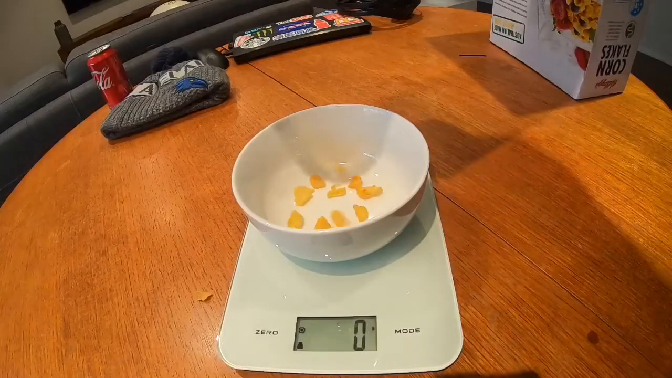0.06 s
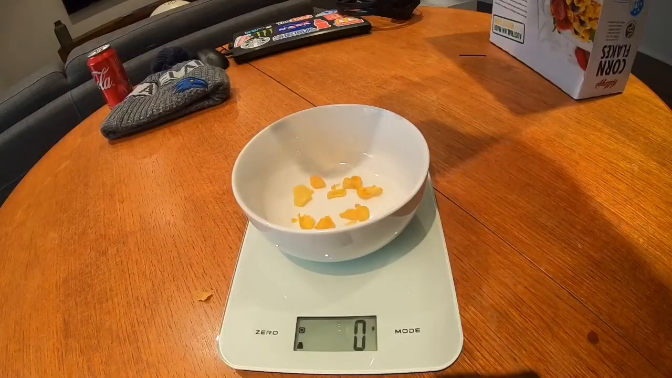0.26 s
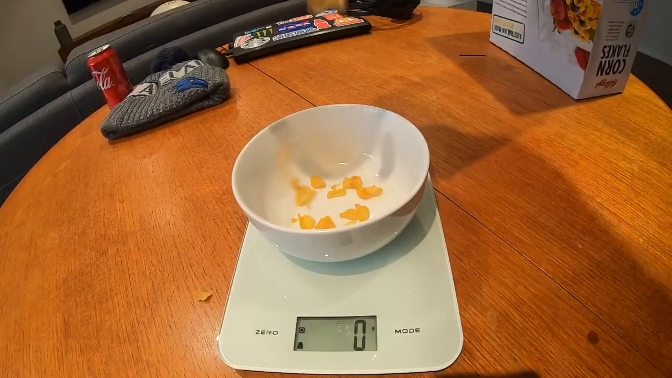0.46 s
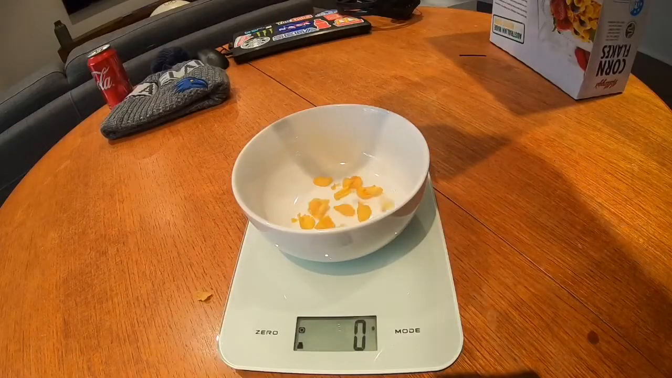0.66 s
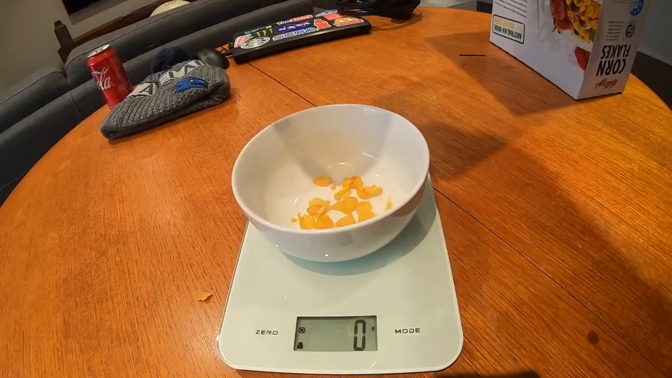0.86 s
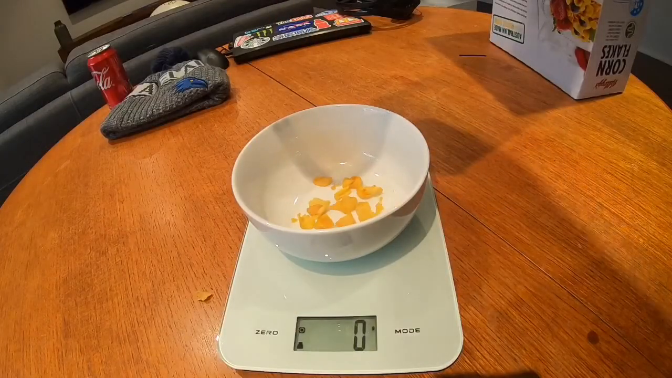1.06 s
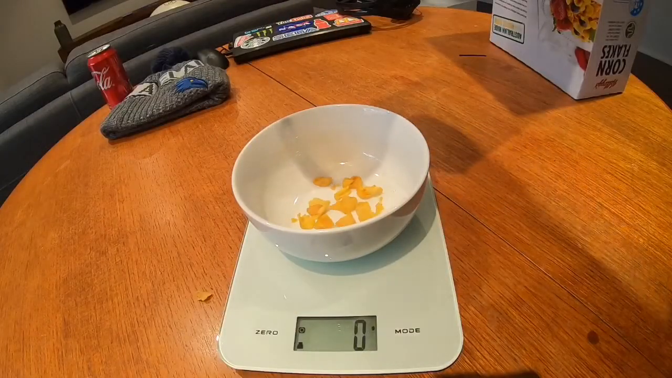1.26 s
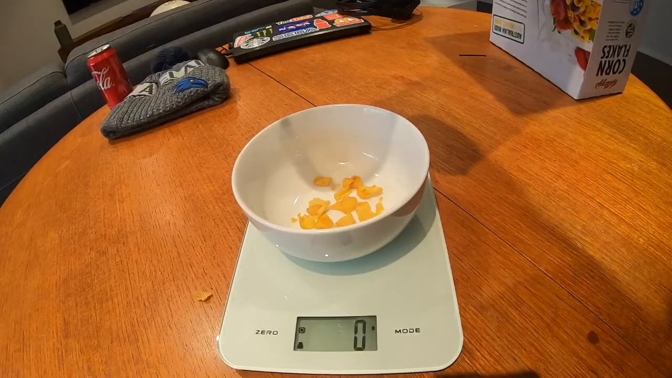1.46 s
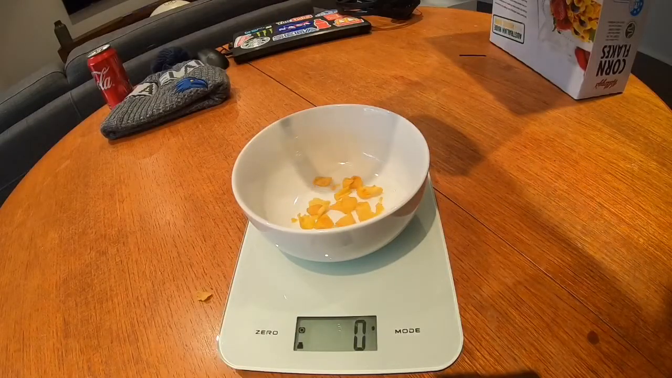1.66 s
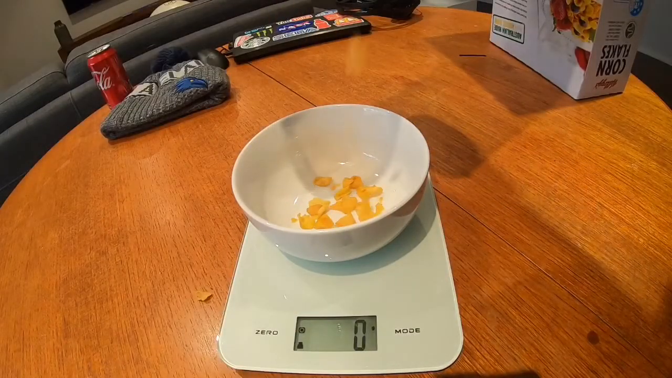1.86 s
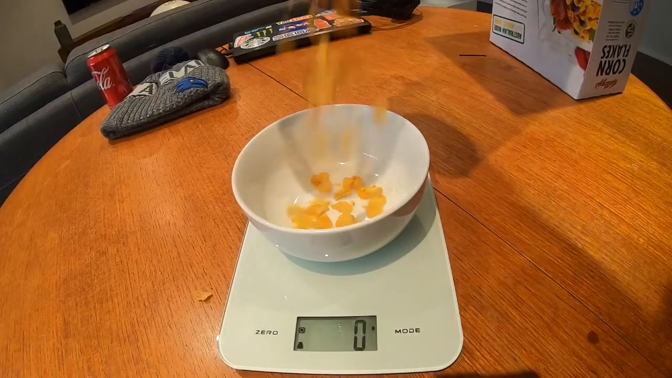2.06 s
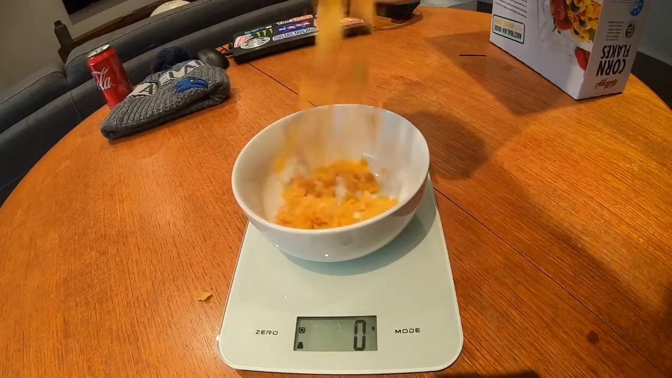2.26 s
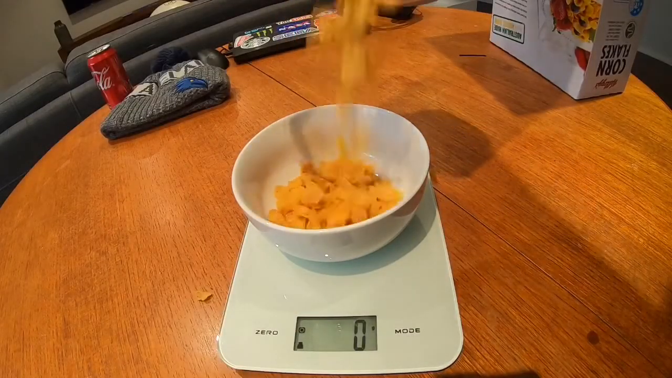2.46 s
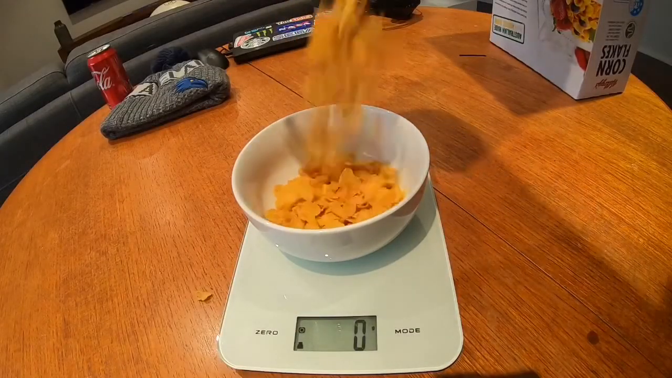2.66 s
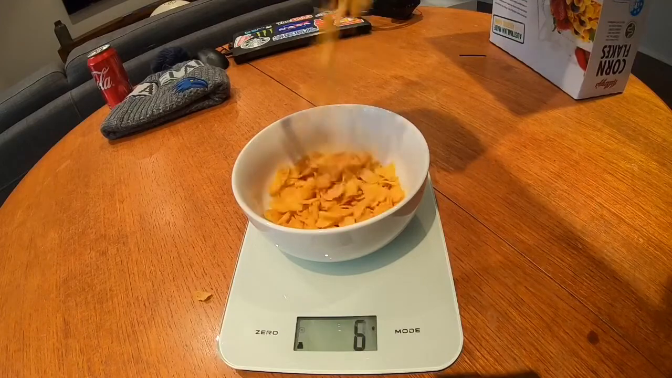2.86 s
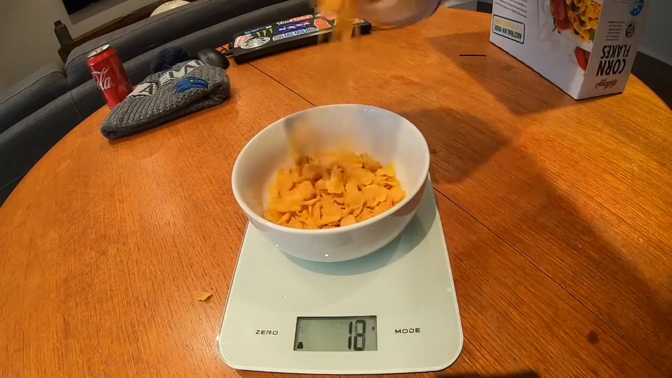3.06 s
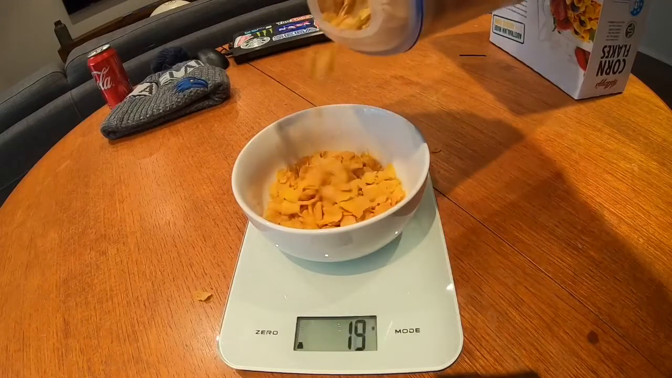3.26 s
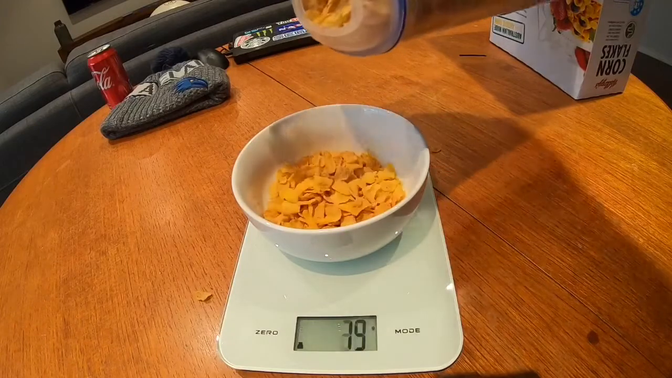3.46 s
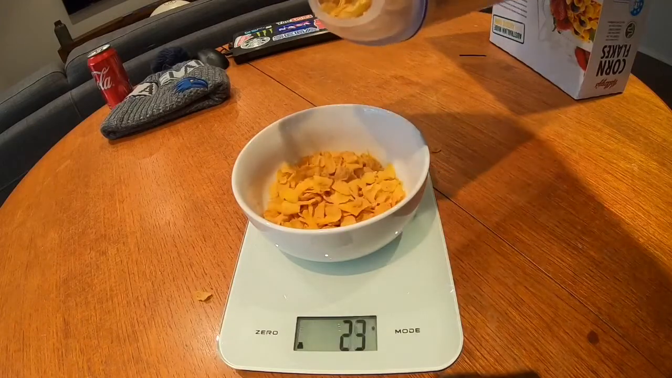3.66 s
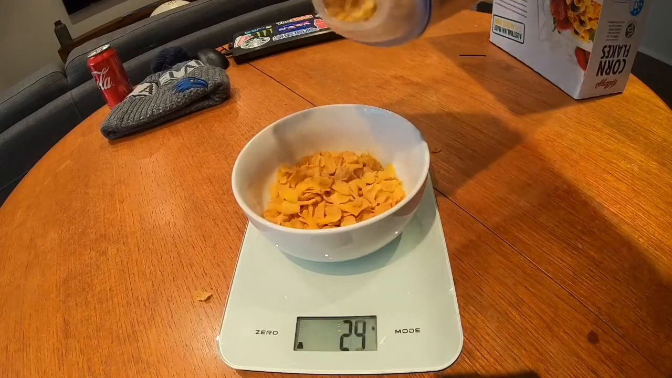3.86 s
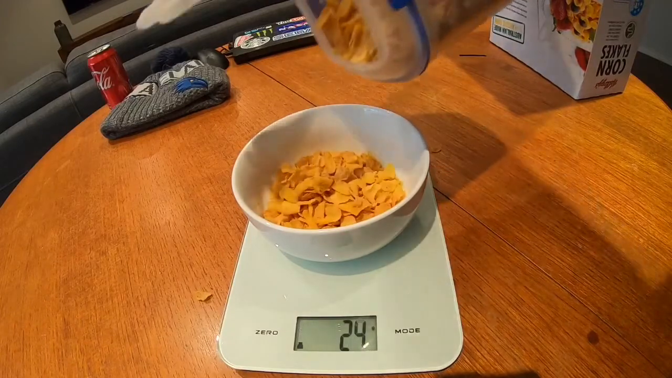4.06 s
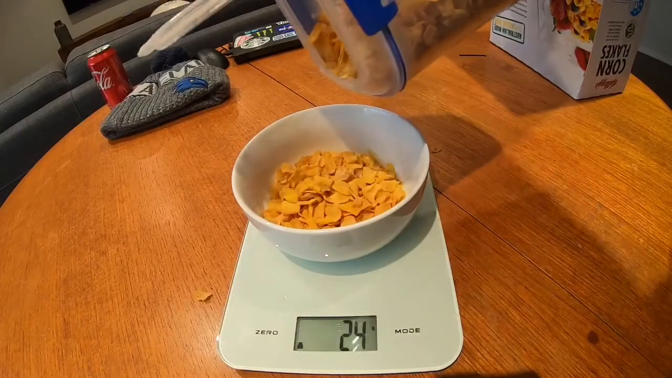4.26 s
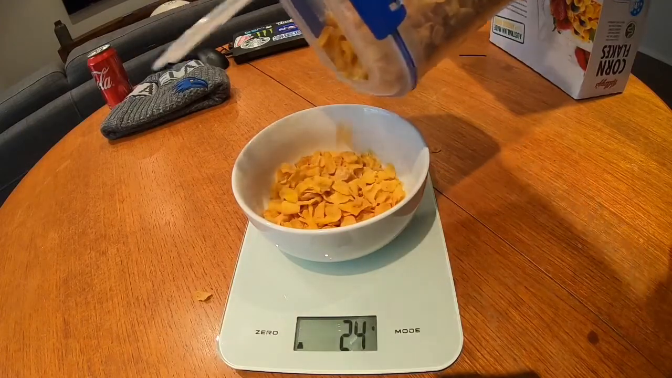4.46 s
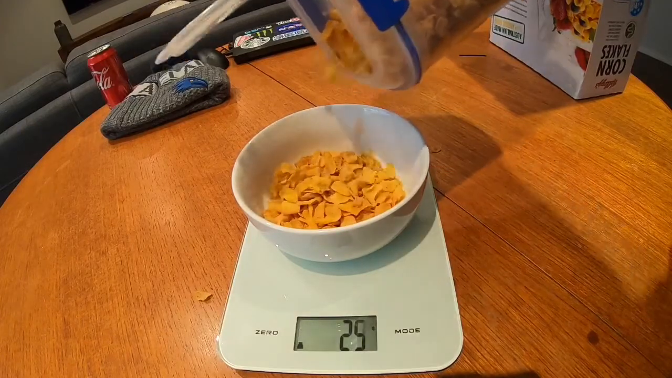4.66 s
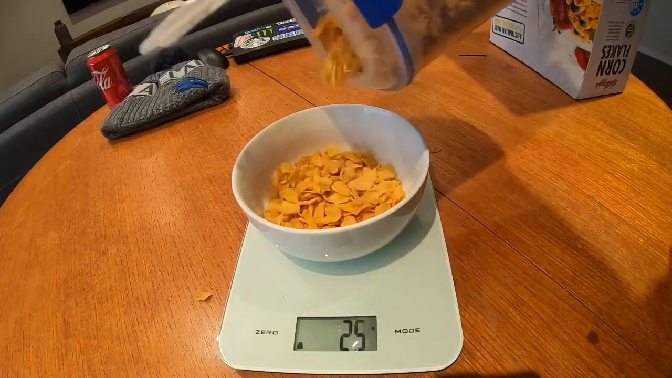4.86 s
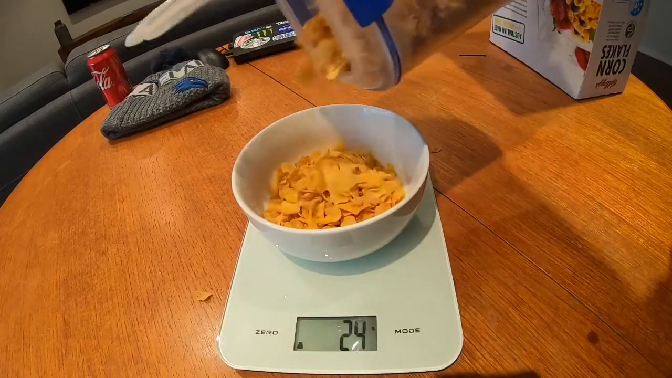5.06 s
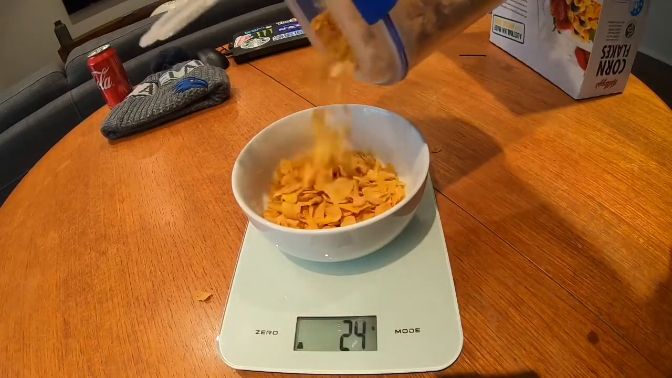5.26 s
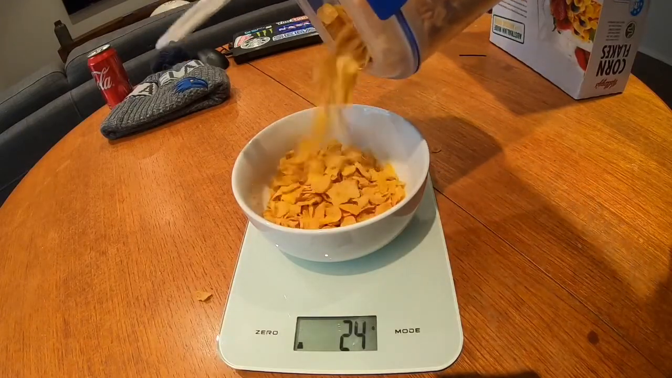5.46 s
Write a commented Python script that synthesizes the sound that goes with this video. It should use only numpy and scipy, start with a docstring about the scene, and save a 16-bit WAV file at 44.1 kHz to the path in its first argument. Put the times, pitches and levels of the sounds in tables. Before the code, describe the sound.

Close stereo capture in a small quiet kitchen. Isolated cereal flakes tick against a nearly empty ceramic bowl, then a near-silent gap. A dense, brittle pour rushes in with crunching clumps and faint bowl pings, thinning to stray ticks. The plastic tub knocks softly, then a lighter, jerky pour lands on the heap.

```python
"""Corn flakes pour from a plastic tub into a ceramic bowl on a kitchen table, close to a two-port microphone.
Each flake is a noise snap with a brief ring; in numbers they make a patter, in runs a crunch.
A few flakes tick and ping the nearly empty bowl, then the load slides down the tub and pours in clumps.
The tub, a noise rustle with a boom, knocks in the hand; a second, shaken pour lands on the heap.
The bowl rings as decaying sines, a small room answers, and a faint room tone and deep rumble lie behind."""
import sys
import numpy as np
from scipy import signal
from scipy.fft import rfft, irfft, next_fast_len
from scipy.io import wavfile
from scipy.ndimage import uniform_filter1d, map_coordinates

SR = 44100
rng = np.random.default_rng(int(sys.argv[2]) if len(sys.argv) > 2 else 0)


def inscribe(sig):
    """Save sig as 16-bit PCM at rate SR to the path in sys.argv[1].

    A 1-D sig is mono; a 2-D sig holds one channel per row.
    Samples are clipped to [-1, 1] before scaling.
    """
    pcm = np.round(np.clip(np.atleast_2d(sig).T, -1, 1) * 32767)
    wavfile.write(sys.argv[1], SR, pcm.astype(np.int16))


N = 243431

# Levels are relative, ahead of room and microphone; spectra give shape only.
# Stream of flakes landing in the bowl, one curve a pour: [t/s, level/dB]
POUR_CURVES = [
    [(0.0, -45.5), (0.252, -47.5), (0.31, -49.5)],
    [(0.55, -73.5), (0.712, -48.5), (0.788, -44), (0.944, -52.5), (1.008, -77.5), (1.08, -68)],
    [(1.95, -43), (2.0, -35), (2.114, -35.5), (2.202, -26.5), (2.326, -26.5), (2.618, -26), (3.114, -33),
     (3.314, -37.5), (3.506, -46), (3.644, -54), (3.8, -90.5)],
    [(4.26, -82), (4.378, -66), (4.74, -44), (4.9, -43), (5.054, -38.5), (5.258, -37), (5.384, -31),
     (5.52, -38)],
]
# Single flakes hitting: [t/s, level/dB, flake's own pitch f/Hz]
SINGLE_FLAKES = [(0.0107, -22.5, 8800), (0.0199, -21.5, 4970), (0.099, -27.5, 3660), (0.1106, -24.5, 5100),
                 (0.271, -36, 9600), (0.5273, -20, 7000), (0.5331, -17.5, 5800), (0.5609, -11.5, 6920),
                 (0.6484, -20.5, 6970), (0.6817, -26, 5170), (0.7076, -23.5, 5230), (0.7434, -16.5, 6230),
                 (0.7665, -28, 5660), (0.7782, -25, 7180), (0.8318, -24.5, 7030), (0.8348, -26, 6880),
                 (1.943, -12.5, 6500), (1.9656, -21, 2730), (1.9925, -20.5, 5460), (2.1899, -8, 4120),
                 (2.2785, -14.5, 7800), (2.353, -9, 5100), (2.7535, -13, 6000), (2.95, -13, 2970),
                 (2.9722, -13, 3480), (3.1, -19, 5860), (3.162, -18, 5660), (3.3471, -25.5, 5760),
                 (3.383, -28.5, 9450), (3.4428, -24, 7000), (3.562, -35, 3360), (3.6206, -34, 3420),
                 (3.657, -38, 6500), (4.4476, -36.5, 6340), (4.4825, -30.5, 8050), (4.492, -36.5, 4630),
                 (4.569, -24, 5630), (4.586, -31, 6300), (4.6891, -25, 5990), (4.788, -23, 5800),
                 (5.0197, -18, 7740), (5.1223, -19, 6990), (5.3634, -14.5, 8210), (5.389, -19, 6940)]
# Clumps of flakes crunching on the heap: [t/s, level/dB, length/s, pitch f/Hz]
CRUNCHING_CLUMPS = [(2.134, -15.5, .04, 7700), (2.2267, -12, 0.029, 8000), (2.256, -12, .035, 5120),
                    (2.371, -12, .04, 4950), (2.4393, -11, 0.035, 8600), (2.624, -12.5, .03, 5160),
                    (2.673, -12.5, .03, 5930), (2.711, -12.5, .05, 6990), (2.772, -12.5, .04, 6130),
                    (2.805, -12, .075, 6040), (3.007, -15, .04, 6720), (3.113, -15, .023, 5560),
                    (3.21, -22, .016, 8490), (3.2313, -14.5, .015, 6230), (3.2495, -15.5, 0.019, 6260),
                    (3.2657, -13.5, .018, 6720), (3.3345, -14.5, .012, 5530), (3.412, -16.5, .014, 7830),
                    (3.4247, -17.5, .014, 7160), (3.9, -52, 0.053, 6000), (4.8237, -19.5, .017, 7300),
                    (5.03, -12, .013, 8200), (5.069, -21, .018, 8300), (5.125, -20, .04, 6600),
                    (5.213, -14.5, .014, 6100), (5.2604, -17.5, .017, 7400), (5.304, -15, .017, 7050),
                    (5.3227, -15, .025, 6800)]
# Colour of flakes landing in stream and clumps: [f/Hz, level/dB]
LANDING_SPECTRUM = [(180, -29), (300, -32), (614, -32.5), (1230, -16.5), (1300, -15), (1610, -12),
                    (1930, -7), (2210, -8.5), (2880, -2.5), (4370, -3.5), (6520, 0.5), (9550, -1.5),
                    (11100, -13), (14000, -15.5), (16000, -26.5)]
# Air resonances in the bowl: [f/Hz, width/Hz, level/dB]
BOWL_AIR = [(1913, 210, 5.5), (2800, 100, 1.5), (790, 200, 9)]
# Colour of a lone flake's tick: [f/Hz, level/dB]
LONE_TICK_SPECTRUM = [(180, -46.5), (300, -41), (1560, -12.5), (2000, -9), (2480, -12.5), (3030, -5.5),
                      (4230, -5.5), (6620, -3), (7820, -4.5), (9390, -6.5), (11100, -17.5), (12100, -14.5),
                      (16000, -35.5)]
# Ringing modes of the ceramic bowl: [f/Hz, t60/s, how easily a flake stirs it level/dB]
BOWL_MODES = [(1330, 1.16, -61.5), (3320, 0.53, -60.5), (5129, 0.34, -45), (5770, .26, -67),
              (6800, 0.16, -68.5), (7340, .2, -66.5)]
# Flakes pinging the bowl, damped once the heap has grown; the spot decides which modes ring:
# [t/s, first mode level/dB, second mode level/dB, third mode level/dB, upper modes level/dB]
BOWL_PINGS = [(.012, -68, -66, -42.5, -66), (.112, -68, -72, -49.5, -68), (.562, -56, -53, -54.5, -61),
              (0.709, -71, -59, -41.5, -67), (.744, -50.5, -42.5, -44.5, -41),
              (2.192, -47, -48, -37.5, -54), (2.259, -57.5, -46, -27, -50), (2.343, -61, -47, -29, -48),
              (2.688, -43.5, -33, -41.5, -56.5), (2.799, -48, -38, -49, -54), (3.617, -76, -60, -68, -61),
              (5.421, -56, -32, -65, -65)]
# The load sliding along the tub, one curve for each slow tilt: [t/s, level/dB]
SLIDE_CURVES = [
    [(1.1, -93), (1.3, -70.5), (1.62, -54), (1.95, -49), (2.45, -52), (3.1, -59.5), (3.45, -74),
     (3.78, -80.5)],
    [(3.8, -77), (4.12, -78.5), (4.27, -70.5), (4.4, -64), (4.53, -78), (4.72, -65.5), (4.88, -66)],
]
# The tub's wall booms less as the load leaves it, more when tipped back: [t/s, boom over rustle level/dB]
LOAD_BOOM = [(1.3, 5), (2.2, 2.5), (2.8, -4.5), (3.7, 8), (4.7, 1.5)]
# Jerks of the hand that shift the flakes in the tub: [t/s, level/dB, hold/s, boom over rustle level/dB]
HAND_SHAKES = [(0.063, -63.5, .02, 8), (0.307, -52, 0.047, 3.5), (0.504, -65, 0.12, 6),
               (0.859, -69.5, 0.022, 10.5), (4.609, -55, 0.045, 1.5), (4.871, -54, 0.038, 4),
               (4.979, -56.5, 0.023, -1), (5.131, -51, 0.044, -1), (5.275, -59.5, 0.21, -2.5)]
# Colour of flakes scraping on plastic: [f/Hz, level/dB]
RUSTLE_SPECTRUM = [(190, -24.5), (330, -7.5), (442, -7.5), (537, -5), (996, -1), (1170, 2), (1620, -2.5),
                   (1940, -0.5), (2100, -1.5), (2680, -0.5), (4730, -4), (6440, -2.5), (9670, -12),
                   (14300, -34), (16000, -46.5)]
# Air resonances in the tub: [f/Hz, width/Hz, level/dB]
TUB_AIR = [(1156, 100, 0), (1940, 120, 2)]
# Colour of the tub wall's boom: [f/Hz, level/dB]
BOOM_SPECTRUM = [(65, -36), (110, -22), (145, -7), (205, 1), (259, -2.5), (307, -3.5), (351, -13.5),
                 (420, -26), (550, -47.5), (920, -120)]
# The tub knocking in the hand: [t/s, level/dB, clack over thud level/dB]
TUB_KNOCKS = [(0.04, -43.5, 7.5), (0.581, -45, -7), (3.874, -48, -1.5), (4.019, -42, -12),
              (4.189, -38, 1.5)]
# Modes of the tub's wall: [f/Hz, level/dB, t60/s]
TUB_MODES = [(175, -12, .09), (206, 6.5, 0.08), (303, -17, .04)]
# Decay of the small room: [f/Hz, t60/s]
ROOM_DECAY = [(200, 0.11), (1500, 0.26), (6000, 0.3), (14000, 0.15)]
# Colour of the room tone: [f/Hz, level/dB]
ROOM_TONE_SPECTRUM = [(29, -29), (50, -4.5), (66, -19), (112, -31), (134, -8.5), (157, 6.5), (267, -29.5),
                      (376, -23), (452, -23.5), (568, -22.5), (1240, -20.5), (1360, -19), (1460, -27),
                      (3320, -28), (12000, -71.5), (15600, -96), (22000, -120)]
# Balance of the microphone ports: [f/Hz, left minus right level/dB]
PORT_BALANCE = [(60, -4), (130, -2), (290, -3), (640, -1), (1410, 2), (3100, 0.5), (6820, -4.5), (15000, 1)]
# Gain on the difference between the ports: [f/Hz, level/dB]
PORT_DIFFERENCE = [(150, -9), (500, 0.5), (1000, -1), (2000, -4), (4000, -8), (8000, 4)]

TOP_HZ = 15950  # band limit of the microphone
STRAY_PER_S, STRAY_DB, STRAY_SCATTER_DB = 40, -12, 4.5  # larger flakes that stand out of the stream
SHAKE_ATTACK_S, SHAKE_FALL_DB_PER_S = 0.031, 147.5
SLOW_SLIDE_DB, SLOW_SLIDE_HZ = -69, 2500  # well below this level the flakes only creep, and sound dull
RUMBLE_DB, RUMBLE_WANDER_DB, RUMBLE_TURNS_PER_S = -76, 2.5, 8
BUMP_S, BUMP_DB, BUMP_WIDTH_S = 1.016, -54, .045  # one soft, deep bump


def pouring(flow, crowding):
    """The stream patters into the bowl: its contacts merge when heavy, and it is duller when it only trickles."""
    patter = amp(-3) * stream(rate=650, scatter_db=3.5, side_db=-10, merged=.3 * crowding)
    stray_times = rng.uniform(0, N / SR, int(STRAY_PER_S * N / SR))
    strays = shower(stray_times, centre_hz=5600, scatter_db=STRAY_SCATTER_DB, size=N, side_db=-4.5)
    trickle = 1 / (1 + flow / amp(-48))
    return dulled(flow * (patter + amp(STRAY_DB) * unit(strays)), trickle, corner_hz=4000)


def clumps(count=20):
    """A clump lands as a run of contacts that swells at once and trails off."""
    out, t = np.zeros((2, N)), np.arange(SR // 8) / SR
    for s, db, length_s, pitch_hz in CRUNCHING_CLUMPS:
        rise = length_s / 4
        steps = (np.arange(count) + rng.random(count)) / count
        times = length_s * steps ** 1.2  # contacts thin out towards the end
        crunch = shower(times, pitch_hz, scatter_db=2.5, size=len(t), side_db=-13.5)
        crunch = crunch * (t / rise + 0.14) * np.exp(-t / rise)
        add(out, s, amp(db - 7.5) * np.sqrt(rise * SR) * crunch / np.linalg.norm(crunch))
    return out


def single_flakes(count=4):
    """A lone flake gives one sharp tick, then rocks to rest on other edges in a few weaker ones."""
    out = np.zeros((2, N))
    for s, db, pitch_hz in SINGLE_FLAKES:
        # the first edge sounds the flake's own pitch
        edges = np.exp(0.32 * rng.standard_normal(count) * (np.arange(count) > 0))
        tick = ticks(pitch_hz * edges, snap_t60=0.0044, ring_db=-6.0, cycles=41, side_db=-7.0)
        gaps = .002 * rng.uniform(.5, 1.3, count)
        for k, delay in enumerate(np.cumsum(gaps) - gaps[0]):
            add(out, s + .0007 + delay, amp(db + 8.0 - 7.5 * k) * tick[:, k])
    return out


def stream(rate, scatter_db, side_db, merged, count=300):
    """An even flow of contacts, near rms 1; the merged share is noise, too dense to tell apart."""
    times = rng.uniform(0, N / SR, int(min(rate, 1400) * N / SR))
    # large and small flakes arrive in batches, so the colour keeps shifting
    batch = np.interp(times, np.linspace(0, N / SR, count), rng.standard_normal(count))
    flow = shower(times, 5600 * np.exp(.2 * batch), scatter_db, N, side_db)
    power = np.abs(uniform_filter1d(np.mean(flow ** 2, axis=0), size=1000))
    flow = flow / np.sqrt(power + 1e-9)
    merged = np.clip(merged, 0, .8)
    return np.sqrt(1 - merged) * flow + np.sqrt(merged) * pair((N,), side_db)


def shower(times, centre_hz, scatter_db, size, side_db):
    """Many flakes of random size and pitch touch at the given times."""
    pitch_hz = np.clip(centre_hz * np.exp(0.3827 * rng.standard_normal(len(times))), 1000, TOP_HZ)
    grains = ticks(pitch_hz, snap_t60=0.0059, ring_db=-7.5, cycles=73, side_db=side_db)
    grains = grains * amp(scatter_db * np.minimum(rng.standard_normal((len(times), 1)), 2))
    where = (times * SR).astype(int)[:, None] + np.arange(grains.shape[-1])
    return np.array([np.bincount(where.ravel(), g.ravel(), size)[:size] for g in grains])


def ticks(pitch_hz, snap_t60, ring_db, cycles, side_db, size=280):
    """One brittle contact for each pitch: a snap and the flake's brief ring, energy 1 a port on average."""
    t, f = np.arange(size) / SR, pitch_hz[:, None]
    snap = pair((len(f), size), side_db) * amp(-60 * t / snap_t60)
    # high notes reach the two ports out of step
    phase = rng.uniform(0, 2 * np.pi, f.shape) + rng.normal(0, 1, (2, *f.shape)) * f / 14000
    ring = np.sin(2 * np.pi * f * t + phase) * amp(-60 * t * f / cycles)  # 60 dB down after so many cycles
    tick = snap + amp(ring_db) * ring
    return tick / np.sqrt(np.sum(tick ** 2, axis=(0, 2), keepdims=True) / 2)


def bowl(contacts):
    """Every contact stirs the ceramic anew and direct hits ping it; the growing heap muffles the ring."""
    t = np.arange(3 * SR // 2) / SR
    modes = np.array([np.sin(2 * np.pi * hz * t) * amp(-60 * t / t60) for hz, t60, _ in BOWL_MODES])
    filled = np.interp(np.arange(N) / SR, [2.4, 2.8], [0, 1])
    out = np.zeros((2, N))
    for mode, (hz, _, stir_db) in zip(modes, BOWL_MODES):
        muffled_db = stir_db - 15 * filled * (hz > 4000)
        out += signal.fftconvolve(contacts.mean(axis=0) * amp(muffled_db), mode)[:N]
    for s, *db in BOWL_PINGS:
        damping = amp(-45 * t * filled[round(s * SR)])
        mode_db = np.pad(db, (0, len(BOWL_MODES) - len(db)), "edge")  # upper modes share the last level
        add(out, s, amp(mode_db) @ modes * damping)
    return out


def sliding():
    """The load scrapes down the tub in fine grains and makes its wall boom."""
    tilt = sum(swell(*np.transpose(slide)) for slide in SLIDE_CURVES)
    moves = [(tilt, np.interp(np.arange(N) / SR, *np.transpose(LOAD_BOOM)))]
    moves += [(amp(db) * jerk(s, hold_s), boom_db) for s, db, hold_s, boom_db in HAND_SHAKES]
    motion = np.sqrt(sum(gain ** 2 for gain, _ in moves))
    boom = np.sqrt(sum((gain * amp(boom_db)) ** 2 for gain, boom_db in moves))
    scrape = amp(10) * motion * stream(rate=800, scatter_db=3.5, side_db=-3, merged=0.5)
    creeping = 1 / (1 + motion / amp(SLOW_SLIDE_DB))
    rustle = coloured(dulled(scrape, creeping, SLOW_SLIDE_HZ), RUSTLE_SPECTRUM, TUB_AIR)
    return rustle + amp(-2) * boom * coloured(pair((N,), side_db=-30.5), BOOM_SPECTRUM)


def jerk(s, hold_s):
    """Gain of one shake: the flakes start to move, slide on, and settle."""
    t = np.arange(N) / SR - s
    settling = amp(-SHAKE_FALL_DB_PER_S * np.maximum(t - SHAKE_ATTACK_S - hold_s, 0))
    return np.clip(t / SHAKE_ATTACK_S, 0, 1) * settling


def knocks():
    """The tub's wall thuds softly in a few decaying modes, with a short plastic clack of noise."""
    out, t = np.zeros((2, N)), np.arange(SR // 4) / SR
    clacks = np.zeros((2, N))
    thud = sum(amp(db - 60 * t / t60) * np.sin(2 * np.pi * hz * t) for hz, db, t60 in TUB_MODES)
    thud = thud * (1 - np.exp(-(t / 0.0017) ** 2))  # soft onset
    for s, db, clack_db in TUB_KNOCKS:
        add(out, s, amp(db - 3.5) * thud)
        clack = pair(t.shape, side_db=0.0) * amp(-60 * t / 0.014)
        add(clacks, s, amp(db + clack_db + 0.5) * clack)
    knock = out + coloured(clacks, [(250, 3.5), (600, 2.5), (1500, 5.5), (2600, 3.5), (7000, -14), (15000, -57)])
    # so small a wall radiates no deep bass
    return signal.sosfilt(signal.butter(N=4, Wn=140, btype="high", fs=SR, output="sos"), knock)


def room(x, wet_db, early_db, count=14):
    """A short diffuse tail starts at once, with a few early echoes in its first milliseconds."""
    hz, t, z = signal.stft(rng.standard_normal((2, SR // 2)), SR, nperseg=256)
    decay = amp(-60 * t / along(ROOM_DECAY, hz)[:, None])
    tail = signal.istft(z * decay, SR, nperseg=256)[1]
    answer = amp(wet_db) * tail / np.linalg.norm(tail[0])
    # table and nearby things echo
    for delay in rng.uniform(.001, .012, count):
        add(answer, delay, amp(early_db) / np.sqrt(count) * rng.choice([-1, 1], (2, 1)))
    return x + signal.fftconvolve(x, answer, axes=1)[:, :N]


def background():
    """Room tone and a deep rumble, both filtered noise; the rumble wanders at random, with one soft bump."""
    t = np.arange(N) / SR
    turns = rng.standard_normal(int(t[-1] * RUMBLE_TURNS_PER_S) + 4)
    wander = map_coordinates(turns, [t * RUMBLE_TURNS_PER_S])
    bump = amp(BUMP_DB) * np.exp(-((t - BUMP_S) / BUMP_WIDTH_S) ** 2)
    level = amp(RUMBLE_DB + RUMBLE_WANDER_DB * wander) + bump
    deep = coloured(pair((N,), side_db=-14), [(15, -19.5), (35, 2.5), (55, -22.0), (110, -44), (400, -120)])
    return amp(-62) * coloured(pair((N,), side_db=1.5), ROOM_TONE_SPECTRUM) + level * deep


def amp(db):
    """Decibels to gain."""
    return 10 ** (np.asarray(db) / 20)


def unit(x):
    """Scale to rms 1."""
    return x / np.sqrt(np.mean(x ** 2) + 1e-20)


def along(points, hz):
    """Read (f/Hz, value) points on a log frequency axis."""
    f, v = np.transpose(points)
    return np.interp(np.log(hz + 1), np.log(f + 1), v)


def swell(s, db):
    """Gain per sample from a level curve, at -120 dB outside it."""
    return amp(np.interp(np.arange(N) / SR, s, db, left=-120, right=-120))


def add(track, s, sound):
    """Mix a sound into a track at time s, cut at the track's end."""
    room_left = track[:, max(round(s * SR), 0):][:, :sound.shape[-1]]
    room_left += sound[..., :room_left.shape[-1]]


def pair(shape, side_db):
    """Left and right noise, partly alike."""
    mid, side = rng.standard_normal((2, *shape))
    return unit(np.array([mid + amp(side_db) * side, mid - amp(side_db) * side]))


def coloured(x, spectrum, peaks=()):
    """Causal minimum-phase filter of unit power from a spectrum and its air resonances."""
    size = 2 * next_fast_len(N // 2 + SR // 8)
    hz = np.fft.rfftfreq(size, 1 / SR)
    db = along(spectrum, hz) + sum(g / (1 + (2 * (hz - f) / w) ** 2) for f, w, g in peaks)
    cepstrum = irfft(np.log(np.maximum(unit(amp(db)), 1e-6)))
    # folding the cepstrum forward lets nothing sound before its cause
    cepstrum[1:size // 2] *= 2
    cepstrum[size // 2 + 1:] = 0
    return irfft(rfft(x, size) * np.exp(rfft(cepstrum)), size)[..., :N]


def dulled(x, share, corner_hz):
    """Take the treble off a share of the sound."""
    soft = signal.sosfilt(signal.butter(N=1, Wn=min(corner_hz, TOP_HZ), fs=SR, output="sos"), x)
    return x + share * (soft - x)


def scene():
    """Flakes, bowl and tub in the kitchen, over the background."""
    flow = sum(swell(*np.transpose(pour)) for pour in POUR_CURVES)
    crowding = flow ** 2 / (flow ** 2 + amp(-30.5) ** 2)  # near 0 for a trickle, towards 1 for a full stream
    landing = coloured(pouring(flow, crowding) + clumps(), LANDING_SPECTRUM, BOWL_AIR)
    lone = coloured(single_flakes(), LONE_TICK_SPECTRUM, [(844, 340, 10.7)])
    contacts = landing + lone
    near = room(contacts + sliding() + knocks(), wet_db=-8.5, early_db=-10.5)
    return near + bowl(contacts) + background()


def record(dry):
    """The two close microphone ports differ in colour and keep nothing above the band limit."""
    size = next_fast_len(N + SR // 4)
    hz = np.fft.rfftfreq(size, 1 / SR)
    left, right = rfft(dry, size)
    mid = (left + right) / 2
    side = (left - right) / 2 * amp(along(PORT_DIFFERENCE, hz))
    balance = amp(np.outer([.5, -.5], along(PORT_BALANCE, hz)))
    ports = np.array([mid + side, mid - side]) * balance
    return irfft(ports * (hz < TOP_HZ), size)[:, :N]


dry = scene()
out = record(dry)
inscribe(out)
```